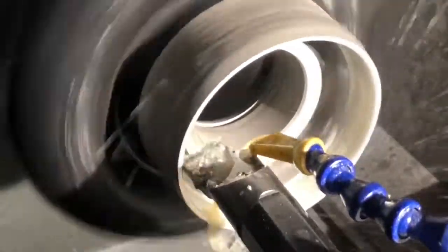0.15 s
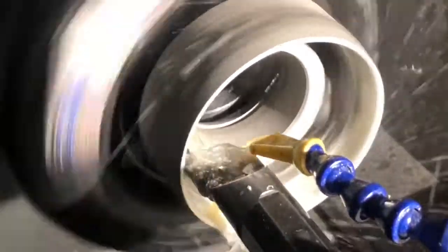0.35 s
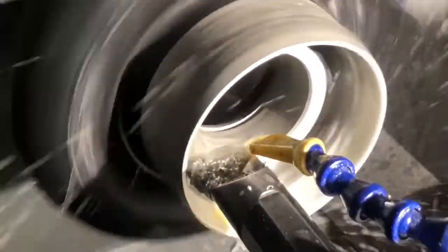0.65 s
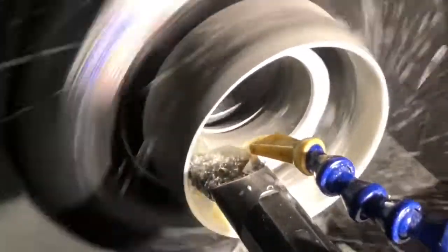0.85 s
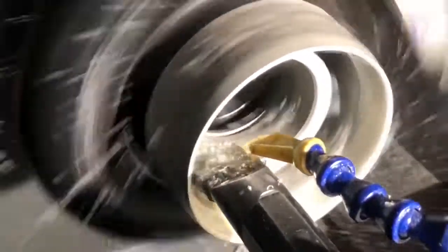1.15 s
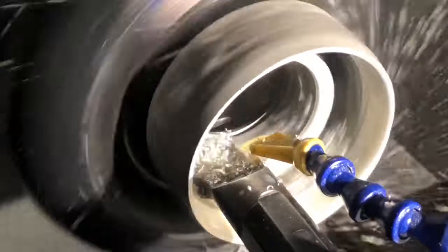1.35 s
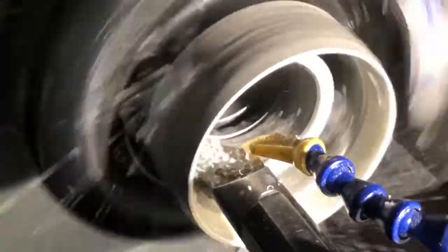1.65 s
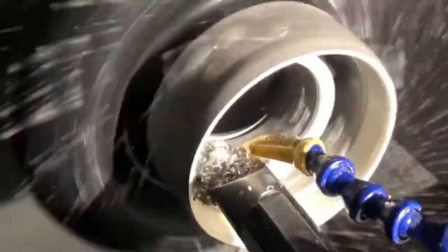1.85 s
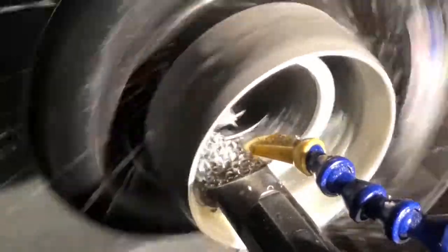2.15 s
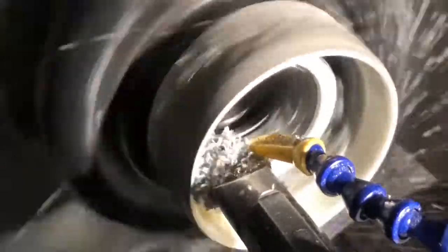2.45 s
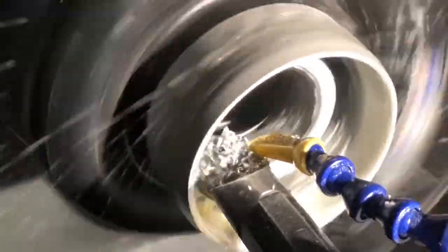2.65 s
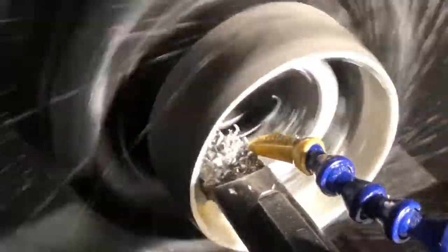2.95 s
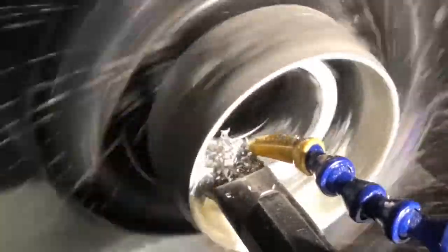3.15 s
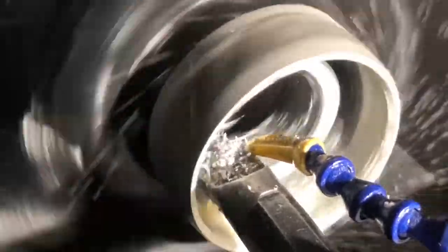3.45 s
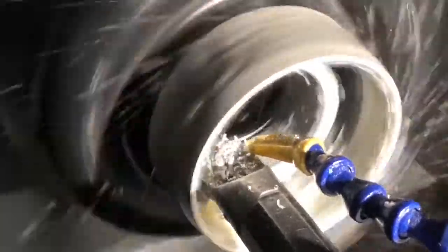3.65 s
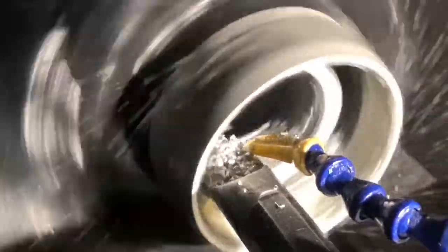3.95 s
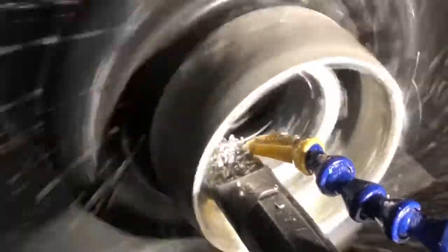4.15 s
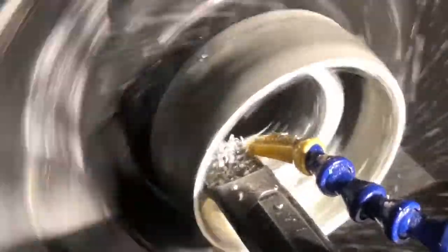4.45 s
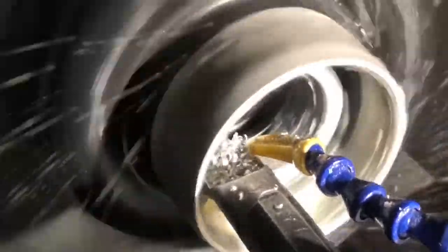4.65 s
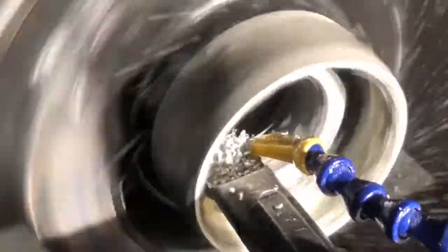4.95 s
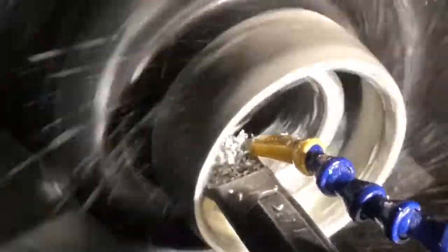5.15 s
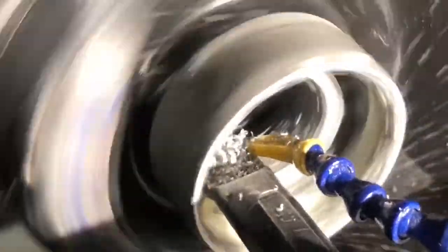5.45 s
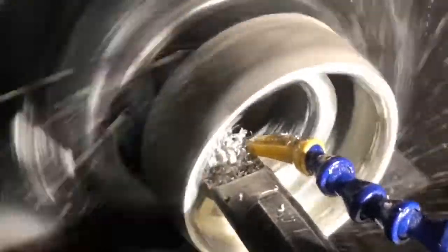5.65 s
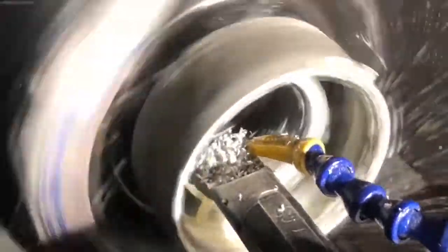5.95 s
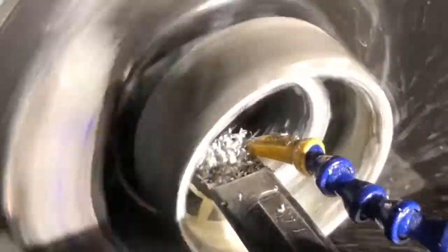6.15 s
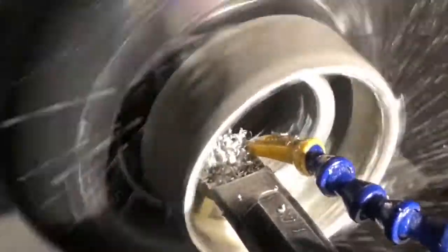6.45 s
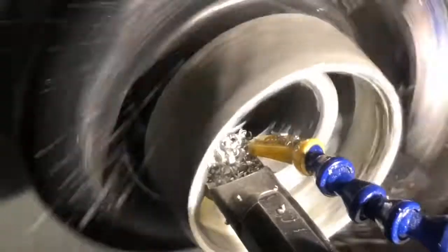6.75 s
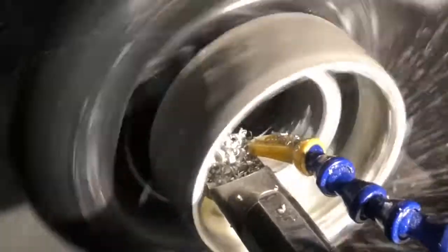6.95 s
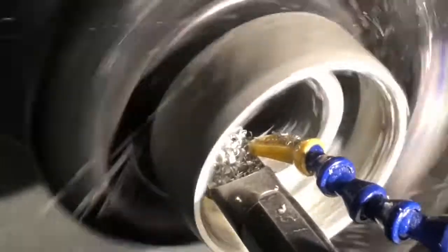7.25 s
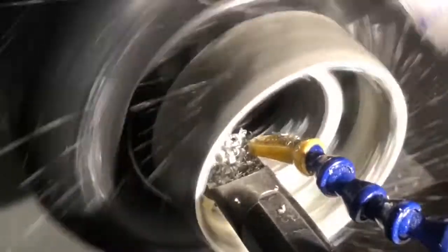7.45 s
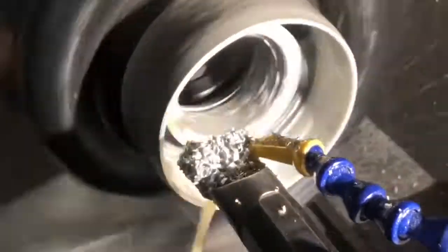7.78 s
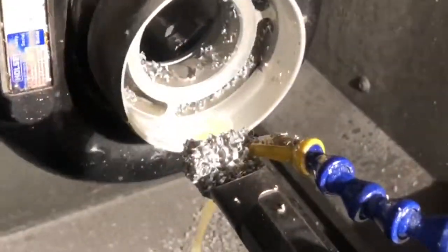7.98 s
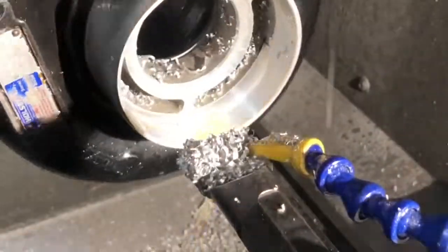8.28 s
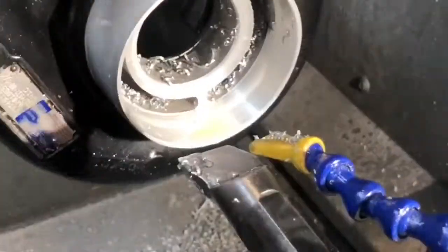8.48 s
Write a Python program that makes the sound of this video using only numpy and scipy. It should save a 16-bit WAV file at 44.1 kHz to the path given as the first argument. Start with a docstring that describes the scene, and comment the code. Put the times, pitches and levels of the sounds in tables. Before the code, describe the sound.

A lathe tool cuts a spinning aluminium ring, heard close up in a workshop. A high scraping hiss stops early for about a second, leaving the drive's hum and a few sharp, ringing scrapes. The cut returns as a fast rasping flutter, then runs on with squeaks and several brief dropouts. Near the end the tool chatters with a throbbing whine.

```python
"""At a lathe, close up: a carbide tool bores a spinning aluminium ring.
Tearing chips hiss through the modes of ring and tool; each turn retraces the marks of the last.
The ring runs out of true, so a light cut comes in scrapes, one a turn; late on the tool chatters.
The drive hums underneath, heard alone when the tool leaves the metal."""
import sys
import numpy as np
from scipy import signal
from scipy.fft import rfft, irfft
from scipy.io import wavfile
from scipy.ndimage import uniform_filter1d

SR = 44100
rng = np.random.default_rng(int(sys.argv[2]) if len(sys.argv) > 2 else 0)


def pcm_store(signal):
    """Save signal as 16-bit PCM."""
    levels = np.round(np.clip(np.atleast_2d(signal), -1, 1) * 32767)
    wavfile.write(sys.argv[1], SR, levels.astype(np.int16).T)


N = 380141
TIME_S = np.arange(N) / SR
FREQ_HZ = np.fft.rfftfreq(N, 1 / SR)
SPINDLE_HZ = 27.95

# Passes: start/s, end/s, runout (0 even, 1 interrupted), high spot/turns, rubbing share,
# growl/dB, fizz/dB, peep/dB, chirp/dB (base gains re hiss)
PASSES = [(-0.1, 0.684, 0.15, -0.16, 0.85, -5, -0.5, -22, -25),
          (1.935, 2.75, 0.59, 0.18, 0.28, -8.5, -0.6, -18, -14),
          (2.75, 3.17, 0.49, 0.092, 0.37, -7, -3, -20, -20),
          (3.326, 4.248, 0.091, -.2, 0.12, -7.5, -1.5, -1, -8),
          (4.253, 4.63, .17, -.1, 0.77, -10, -1.5, -6, -7),
          (4.67, 5.876, .04, -0.091, 0.27, -6.5, -0.6, -7, -3.5),
          (5.876, 6.456, 0.21, 0.053, 0.6, -8.5, -2, -20, -18),
          (6.486, 8.7, 0.044, -0.02, 0.25, -6.5, -0.5, 1, -6.5)]
# Tool load, one curve per pass: t/s, relative level/dB
LOAD_CURVES = [
    [(0.0, -29), (0.31, -27.5), (0.35, -24.5), (0.51, -26.5), (0.58, -25), (0.68, -25)],
    [(1.93, -29), (2.07, -31.5), (2.1, -30.5), (2.58, -29.5), (2.71, -33), (2.75, -36)],
    [(2.75, -38), (2.81, -31.5), (2.89, -22), (3.12, -24), (3.14, -25), (3.16, -34)],
    [(3.37, -29), (3.48, -28), (3.59, -27.5), (4.08, -25.5), (4.14, -25.5), (4.25, -34.5)],
    [(4.25, -37.2), (4.32, -27.5), (4.46, -31.5), (4.54, -24.5), (4.62, -39.4), (4.64, -52.1)],
    [(4.67, -52), (4.71, -35.4), (4.77, -30.5), (5.08, -33), (5.11, -29.5), (5.74, -26.5), (5.83, -33.5),
     (5.88, -44)],
    [(5.88, -43), (5.92, -36), (6.06, -24.5), (6.23, -25.5), (6.31, -21.5), (6.36, -32), (6.46, -25)],
    [(6.47, -43), (6.53, -29), (7.19, -31), (7.48, -39), (7.55, -32.5), (7.66, -32), (7.71, -39),
     (7.81, -33.3), (7.99, -33.5), (8.47, -29.0), (8.57, -24), (8.61, -26.2)],
]
# Thin spots in the cut: t/s, half length/s, runout, high spot/turns
THIN_CUTS = [(0.695, 0.046, 0.55, -0.43), (1.95, 0.29, 0.86, 0.13), (2.745, 0.066, 1, 0.2),
             (3.172, 0.091, 0.96, 0.014), (3.407, 0.037, 0.75, 0.12), (4.215, 0.064, 0.72, 0.37),
             (4.653, 0.12, 0.78, -0.084), (5.858, 0.12, 0.7, 0.33), (6.36, 0.076, 0.72, -0.13)]
# Chip snaps, edge runs free: t/s, dip/dB
CHIP_BREAKS = [(7.102, -9), (7.247, -20), (7.316, -23), (7.351, -4), (7.673, -7)]
# Surface marks handed on to the next turn: f/Hz, base share
MARK_CARRYOVER = [(300, 0.67), (800, 0.77), (1500, 0.61), (3300, 0.77), (5000, 0.56), (8000, 0.48),
                  (15000, .1)]
# Modes of ring and tool: f/Hz, width/Hz, rubbed weight/dB, cut weight/dB
METAL_MODES = [(504, 118, -19, -21), (672, 42, -16.5, -20.5), (798, 81, -34, -18), (858.5, 33, -15.5, -20),
               (991, 100, -16, -17), (1082, 65, -20, -16), (1254, 120, -11.5, -12.5), (1382, 146, -13, -13),
               (1694, 73, -17, -14.5), (1990, 780, -24.5, -28.5), (2387, 108, -13.5, -17.5),
               (3040, 280, -10.5, -13.5), (3270, 128, -4.5, -2), (3445, 146, -3, -9.5),
               (3780, 150, -9.5, -7), (4363, 450, -1, -6), (4940, 60, 4.5, -40), (5060, 680, -7.5, -6.5),
               (5560, 95, -8.5, -11), (6284, 394, -10, -10.5), (7074, 340, -5, -10),
               (7780, 400, -18.5, -17.5), (8360, 760, -20, -19.5), (9310, 440, -15, -18.5),
               (10306, 385, -16.5, -18), (11430, 2600, -29.5, -29.5), (13800, 1100, -21.5, -25.5),
               (14000, 270, -10.5, -16), (16300, 1400, -13, -17.5)]
# Mode beams turning with the ring: f/Hz, half width/Hz, place/turns, half length/turns, weight/dB
MODE_BEAMS = [(3345, 150, 0.32, 0.053, 13), (4540, 180, 0.86, .12, 5), (4760, 220, .08, 0.21, 6.5),
              (7100, 210, 0.74, 0.37, 22), (9200, 260, 0.51, 0.12, 11), (10700, 330, 0.72, 0.14, 14)]
# High spot catching the tool: t/s, level/dB, length/s
BITES = [(0.623, -24, .013), (1.537, -18, .010), (1.572, -20.5, 0.012), (1.608, -24, 0.013),
         (1.644, -18.5, 0.011), (1.681, -24, 0.0051), (1.821, -14.5, .015), (1.857, -19, 0.016),
         (3.002, -18, 0.016), (3.034, -19, 0.008), (3.285, -25.5, 0.015), (3.3202, -17.5, 0.02),
         (6.293, -19, 0.011), (6.396, -36, 0.012)]
# Lightly damped ring modes: f/Hz, t60/s, gain/dB
RINGING_MODES = [(3150, 0.18, 1.5), (3460, 0.052, -9), (3770, 0.13, -1), (4340, 0.082, -9),
                 (5000, 0.11, -3), (5940, 0.08, -23), (7260, 0.14, -4.5), (14130, 0.054, -13)]
# Colour shift of the thinner wall: f/Hz, half width/Hz, gain/dB
THIN_WALL_BANDS = [(4380, 220, -6.5), (4710, 100, 5), (5280, 130, 1.5), (7000, 240, -3.5), (8350, 300, 5),
                   (14100, 400, 1.5)]
# Chatter envelope: t/s, level/dB
CHATTER_CURVE = [(7.3, -38), (7.422, -31.5), (7.516, -34), (7.65, -26), (7.688, -27.5), (7.72, -35),
                 (7.774, -28), (7.928, -24.5), (8.144, -27), (8.37, -45), (8.38, -41)]
# Side tones of the tool: start/s, length/s, f/Hz, level/dB
TOOL_WHINES = [(4.72, 0.8, 838, -53), (5.15, 0.48, 1215, -42.5), (5.197, 0.37, 780, -47),
               (7.402, 0.1, 977, -44), (7.86, 0.33, 1360, -41), (7.9, 0.66, 1676, -48)]
# Rush of drive, pump and fan: f/Hz, relative density/dB
DRIVE_SPECTRUM = [(30, -34), (95, -32), (125, -32), (160, -15), (225, -4), (300, -8), (370, -6.5),
                  (490, 5.5), (620, -6), (900, -11.5), (1150, -7), (1400, -11.5), (2700, -11.5),
                  (3300, -11), (4600, -18), (5600, -15.5), (7200, -16.5), (11000, -27.5), (15500, -28)]
# Metal resonances excited by the rush: f/Hz, half width/Hz, gain/dB
DRIVE_PEAKS = [(247.5, 11.4, 4), (4420, 125, 15), (4800, 85, 15), (7200, 200, 4.5), (9460, 180, 6.5),
               (14150, 220, 5)]
# Motor and gear tones: f/Hz, relative level/dB
DRIVE_TONES = [(137, -68.5), (224, -59.5), (403, -50), (1117, -47), (1205, -55.5), (2012, -51.5),
               (2234, -58), (2832, -53.5), (3639, -52.5)]


def cutting(trim_db=-2, usual_load_db=-30, flutter_db=2.12):
    """Edge rubs and cuts through one contact; load and runout favour hiss over growl and fizz."""
    engaged, load_db, runout, spot_turns, rubbing, growl_db, fizz_db, peep_db, chirp_db = pass_state()
    excess_db = load_db + trim_db - usual_load_db
    rubbing = rubbing + 0.09 * excess_db
    runout, spot_turns, rubbing = thin_cuts(runout, spot_turns, rubbing)
    touch = contact(runout, spot_turns)
    flutter = amp(flutter_db * wander(49))
    rub_force = touch * flutter * retraced(tearing(grain_db=-2.5, grain_hz=714), strength=0.16)
    cut_force = touch * retraced(tearing(grain_db=1.5, grain_hz=915), strength=1.19)
    rub = metal(rub_force, rubbed=True)
    cut = metal(cut_force, rubbed=False)
    radiated = spinning(np.sqrt(rubbing) * rub + np.sqrt(1 - rubbing) * cut)
    low = 1 / (1 + (FREQ_HZ / 2800) ** 16)
    high = 1 / (1 + (5800 / (FREQ_HZ + 1)) ** 16)
    growl, hiss, fizz = (unit_rms(filtered(radiated, band)) for band in (low, 1 - low - high, high))
    growl *= amp(growl_db - 0.23 * excess_db - 4.5 * runout)
    fizz *= amp(fizz_db - 0.05 * excess_db - 1.5 * runout)
    squeaks = (1 - rubbing) * (amp(peep_db) * peeps() + amp(chirp_db) * chirps())
    return engaged * amp(load_db + trim_db) * (growl + hiss + fizz + squeaks)


def pass_state():
    """Per sample: tool engagement, load and the current pass settings."""
    rows = np.array(PASSES)
    current = np.maximum(np.searchsorted(rows[:, 0], TIME_S) - 1, 0)
    engaged = np.minimum(sum(gate(start_s, end_s, 0.011) for start_s, end_s in rows[:, :2]), 1)
    load_db = np.choose(current, [envelope_db(curve) for curve in LOAD_CURVES])
    return engaged, load_db, *rows[current, 2:].T


def thin_cuts(runout, spot_turns, rubbing, cut_to_rub=0.46):
    """Where the cut thins, one high spot takes over and the edge rubs more."""
    offset = runout * np.exp(2j * np.pi * spot_turns)
    for t_s, half_s, thin_runout, thin_turns in THIN_CUTS:
        near = np.exp(-((TIME_S - t_s) / half_s) ** 2)
        offset = offset + near * (thin_runout * np.exp(2j * np.pi * thin_turns) - offset)
        rubbing = rubbing + near * cut_to_rub * (1 - rubbing)
    return np.minimum(abs(offset), 1), np.angle(offset) / (2 * np.pi), np.clip(rubbing, .03, 1)


def contact(runout, spot_turns, sharpness=0.46, skew_rad=0.06):
    """Chip thickness swings once a turn; above runout 0.5 the tool cuts air for part of it."""
    angle_rad = 2 * np.pi * (SPINDLE_HZ * TIME_S - spot_turns)
    swing = np.cos(angle_rad + skew_rad * np.cos(angle_rad))
    thickness = np.maximum(1 - runout + runout * swing, 1e-4) ** sharpness
    turn_rms = np.sqrt(uniform_filter1d(thickness ** 2, round(SR / SPINDLE_HZ)) + 1e-3)
    breaks_db = sum(dip_db * np.exp(-((TIME_S - t_s) / .003) ** 2) for t_s, dip_db in CHIP_BREAKS)
    return amp(breaks_db) * thickness / turn_rms


def tearing(grain_db, grain_hz):
    """The chip shears off in tiny uneven jerks."""
    return unit_rms(rng.standard_normal(N) * amp(grain_db * wander(grain_hz)))


def retraced(x, strength):
    """The edge meets its own marks a turn later: feedback comb at the spindle rate."""
    feedback = np.clip(strength * spectrum(MARK_CARRYOVER), 0, .95)
    turn_delay = np.exp(-2j * np.pi * FREQ_HZ / SPINDLE_HZ)
    return filtered(x, np.sqrt(1 - feedback ** 2) / (1 - feedback * turn_delay))


def metal(x, rubbed, taps=4096):
    """Modes of ring and tool as one minimum-phase filter; output rms 1."""
    mode_hz, width_hz, rub_db, cut_db = np.transpose(METAL_MODES)
    f_hz = abs(np.fft.fftfreq(taps, 1 / SR))[:, None]
    modes = amp(rub_db if rubbed else cut_db) / (1 + (2 * (f_hz - mode_hz) / width_hz) ** 2)
    log_gain = np.log((modes ** 2).sum(1) + 1e-10) / 2
    impulse = np.fft.ifft(np.exp(np.conj(signal.hilbert(log_gain)))).real
    return unit_rms(signal.oaconvolve(x, impulse)[:N])


def spinning(x, lobes_db=2.5, lobe_hz=260, drift_hz=0.259, comb_db=1.5, comb_hz=1200, orders=5):
    """Each pitch leaves the turning ring in its own lobes: the colour swirls once a turn."""
    f_hz, t_s, frames = signal.stft(x, SR, nperseg=256, noverlap=192)
    f_hz, turns = f_hz[:, None], SPINDLE_HZ * t_s
    smoothing = np.exp(-((f_hz - f_hz.T) / lobe_hz) ** 2)
    lobes = 0
    for order in range(1, orders + 1):
        weight = smoothing @ (rng.standard_normal(f_hz.shape) + 1j * rng.standard_normal(f_hz.shape))
        cycles = order * turns + drift_hz * rng.uniform(-0.99, 1) * t_s
        lobes = lobes + (weight * np.exp(2j * np.pi * cycles)).real / np.sqrt(order)
    field_db = lobes_db * unit_rms(lobes) * np.minimum(f_hz / 3000, 1)  # long waves spread evenly
    jaw_echo_comb = np.cos(2 * np.pi * (2 * turns - f_hz / comb_hz))
    field_db += comb_db * np.minimum(f_hz / 6000, 1) * jaw_echo_comb
    for centre_hz, half_hz, place_turns, half_turns, beam_db in MODE_BEAMS:
        off_axis = wrapped(turns - place_turns) / half_turns
        field_db += beam_db * np.exp(-((f_hz - centre_hz) / half_hz) ** 2 - off_axis ** 2)
    gain = amp(field_db)
    gain /= np.sqrt(np.mean(gain ** 2, axis=1, keepdims=True))
    return signal.istft(frames * gain, SR, nperseg=256, noverlap=192)[1][:N]


def peeps(f_hz=3255, place_turns=0.45, half_turns=.065, flicker_db=2):
    """A bright ring mode flashes each time its lobe faces the listener."""
    flash = np.exp(-(wrapped(SPINDLE_HZ * TIME_S - place_turns) / half_turns) ** 2)
    return amp(flicker_db * wander(9.1)) * flash * tone(f_hz, 2 * wander(11.4))


def chirps(from_hz=4380, to_hz=5120, place_turns=0.94, half_turns=0.26, glide_turns=0.088):
    """The chip squeaks upward once a turn."""
    turns = wrapped(SPINDLE_HZ * TIME_S - place_turns)
    glide = (1 + np.tanh(turns / glide_turns)) / 2
    f_hz = from_hz + (to_hz - from_hz) * glide + 60 * wander(40.14)
    pulse = amp(3.4 * wander(60)) * np.exp(-(turns / half_turns) ** 4)
    return pulse * np.sqrt(2) * np.sin(2 * np.pi * np.cumsum(f_hz) / SR)


def bites(rise_s=0.0033, release_s=0.0046, lowpass_hz=9000):
    """Single hard scrapes at the high spot: the load rises, sags, lets go."""
    scrape = metal(tearing(grain_db=3.0, grain_hz=710), rubbed=True)
    scrape = unit_rms(filtered(scrape, 1 / np.hypot(1, FREQ_HZ / lowpass_hz)))
    force = np.zeros(N)
    for t_s, level_db, length_s in BITES:
        age_s = np.maximum(TIME_S - t_s, 0)
        decay = np.exp(-.8 * age_s / length_s - np.maximum(age_s - length_s, 0) / release_s)
        force += amp(level_db) * np.minimum(age_s / rise_s, 1) * decay
    return force * scrape


def ringing(x, taps=6000):
    """Narrow modes store part of each scrape and release it as a zing."""
    age_s = np.arange(taps) / SR
    impulse = np.zeros(taps)
    for f_hz, t60_s, gain_db in RINGING_MODES:
        decay = amp(-60 * age_s / t60_s)
        impulse += amp(gain_db) * 2 * decay / decay.sum() * np.sin(2 * np.pi * f_hz * age_s)
    return signal.oaconvolve(x, impulse)[:N]


def thin_wall(x, start_s=6.72, end_s=8.3):
    """The thinner wall shifts the colour during the last pass."""
    recoloured = filtered(x, amp(humps_db(THIN_WALL_BANDS)))
    return x + gate(start_s, end_s, 0.28) * (recoloured - x)


def chatter(bending_hz=1234, throb=0.15, waver=.07):
    """The boring bar sings in its bending mode, throbbing with the turn; side tones come and go."""
    swing = 1 + throb * np.cos(2 * np.pi * SPINDLE_HZ * TIME_S) + waver * wander(50)
    bar = amp(envelope_db(CHATTER_CURVE)) * swing * tone(bending_hz, .5 * wander(2.7) + .06 * wander(40))
    bar *= gate(CHATTER_CURVE[0][0], CHATTER_CURVE[-1][0], 0.11)
    for start_s, length_s, f_hz, level_db in TOOL_WHINES:
        arch = np.sin(np.pi * np.clip((TIME_S - start_s) / length_s, 0, 1))
        bar += amp(level_db) * arch * tone(f_hz, .5 * wander(16))
    return bar


def chuck_thrum(level_db=-46, centre_hz=640, width_hz=260):
    """The heavy opening pass shakes the chuck."""
    band = 1 / (1 + (2 * (FREQ_HZ - centre_hz) / width_hz) ** 4)
    shake = unit_rms(filtered(retraced(rng.standard_normal(N), strength=0.76), band))
    return amp(level_db) * shake * gate(-1, PASSES[0][1], .02)


def guard_echoes(x, t60_s=0.041, delay_s=.003, density=.08, taps=9000):
    """Short dense echoes off the sheet-metal guards."""
    age_s = np.arange(taps) / SR
    impulse = rng.standard_normal(taps) * (rng.random(taps) < density)
    impulse *= (age_s > delay_s) * amp(-60 * age_s / t60_s)
    return signal.oaconvolve(x, impulse / np.linalg.norm(impulse))[:N]


def drive(rush_db=-40.95, tones_db=-5.5, swell_db=-0.1):
    """Rush of spindle and pump under wavering motor and gear tones."""
    colour = amp(spectrum(DRIVE_SPECTRUM) + humps_db(DRIVE_PEAKS))
    rush = unit_rms(filtered(rng.standard_normal(N), colour)) * amp(swell_db * wander(16))
    tones = sum(amp(level_db + 2.5 * wander(4.8)) * tone(f_hz, 0.73 * (f_hz / 1000) * wander(6.8))
                for f_hz, level_db in DRIVE_TONES)
    return amp(rush_db) * rush + amp(tones_db) * tones


def amp(db):
    """dB to gain."""
    return 10 ** (np.asarray(db) / 20)


def unit_rms(x):
    """Scale to rms 1."""
    return x / np.sqrt(np.mean(x ** 2) + 1e-20)


def tone(f_hz, phase_rad):
    """Phase-modulated sine, rms 1."""
    return np.sqrt(2) * np.sin(2 * np.pi * f_hz * TIME_S + phase_rad)


def wander(rate_hz):
    """Smooth random curve, rms 1."""
    return unit_rms(filtered(rng.standard_normal(N), np.exp(-(FREQ_HZ / rate_hz) ** 2)))


def wrapped(turns):
    """Wrap to within half a turn of zero."""
    return (turns + .5) % 1 - .5


def gate(start_s, end_s, fade_s):
    """Window with linear edges."""
    return np.clip(np.minimum(TIME_S - start_s, end_s - TIME_S) / fade_s + .5, 0, 1)


def envelope_db(points):
    """Interpolate levels onto TIME_S."""
    return np.interp(TIME_S, *np.transpose(points))


def spectrum(points):
    """Interpolate onto FREQ_HZ in log frequency."""
    f_hz, values = np.transpose(points)
    return np.interp(np.log(FREQ_HZ + 1), np.log(f_hz + 1), values)


def humps_db(rows):
    """Sum of Gaussian humps on FREQ_HZ."""
    return sum(db * np.exp(-((FREQ_HZ - f_hz) / half_hz) ** 2) for f_hz, half_hz, db in rows)


def filtered(x, gain):
    """Apply a gain given on FREQ_HZ."""
    return irfft(rfft(x) * gain, N)


def scene(echo_db=-15, highpass_hz=200):
    """Tool over drive, both channels alike; the small ring radiates no bass."""
    tool = filtered(cutting() + bites(), 1 / (1 + (highpass_hz / (FREQ_HZ + 1)) ** 4))
    tool = thin_wall(tool + ringing(tool))
    mono = tool + amp(echo_db) * guard_echoes(tool) + chuck_thrum() + chatter() + drive()
    return np.array([mono, mono])


def record(dry, lowpass_hz=15850):
    """Steep band limit."""
    kernel = signal.firwin(511, lowpass_hz, window=("kaiser", 9), fs=SR)
    return signal.oaconvolve(dry, kernel[None], "same")


dry = scene()
out = record(dry)
pcm_store(out)
```